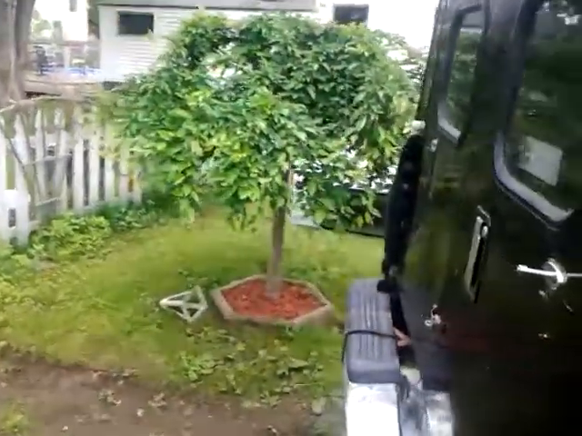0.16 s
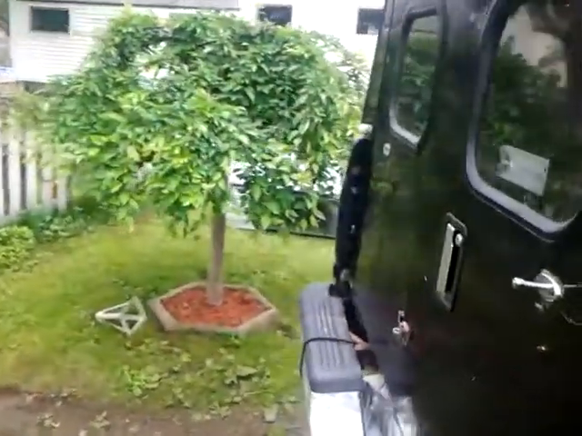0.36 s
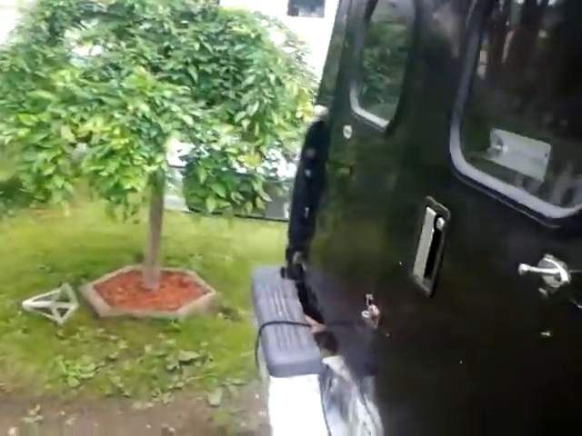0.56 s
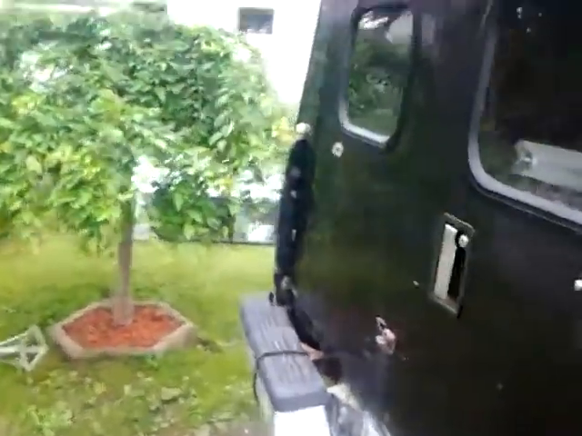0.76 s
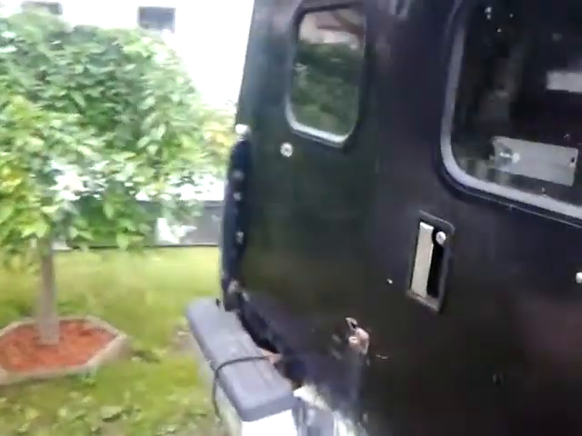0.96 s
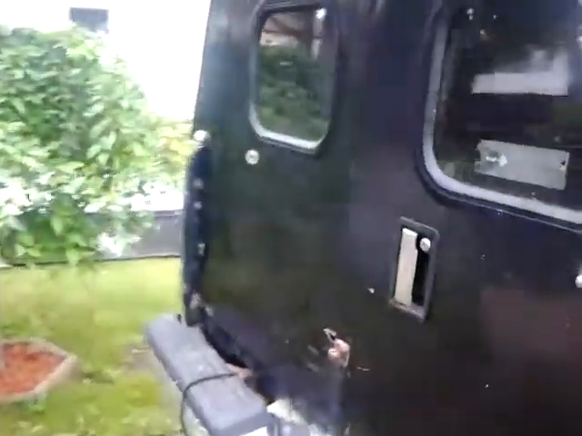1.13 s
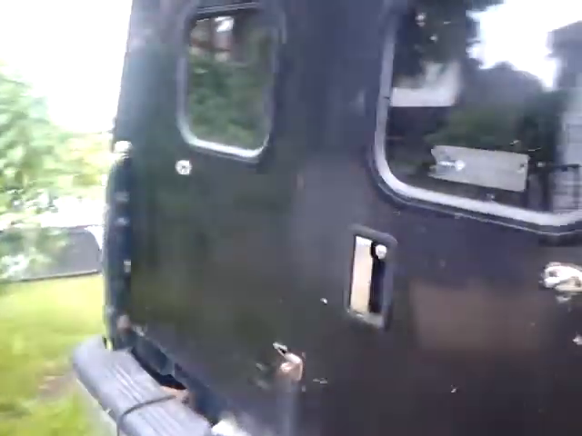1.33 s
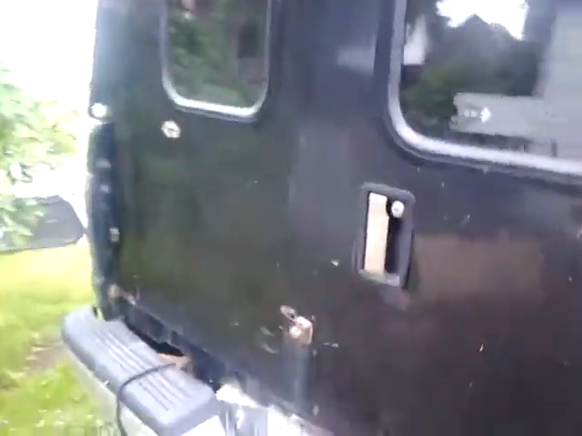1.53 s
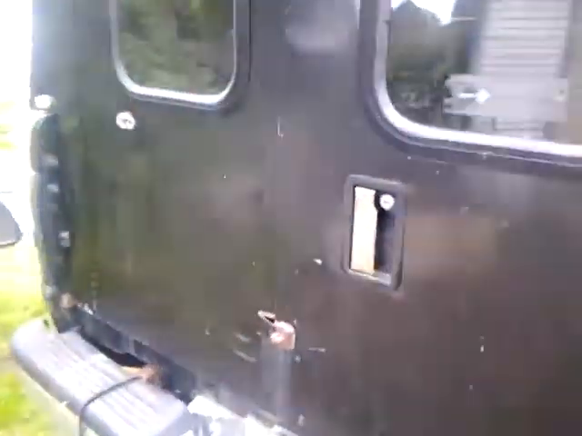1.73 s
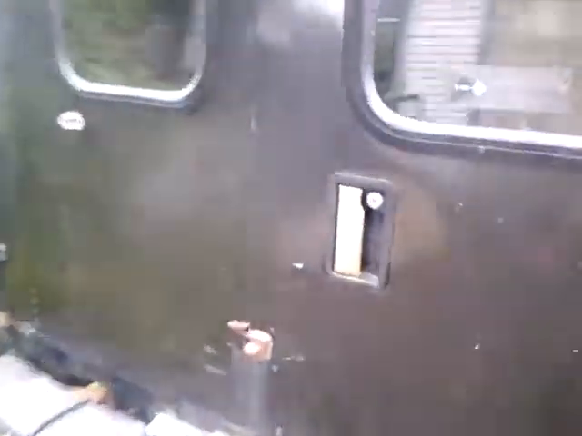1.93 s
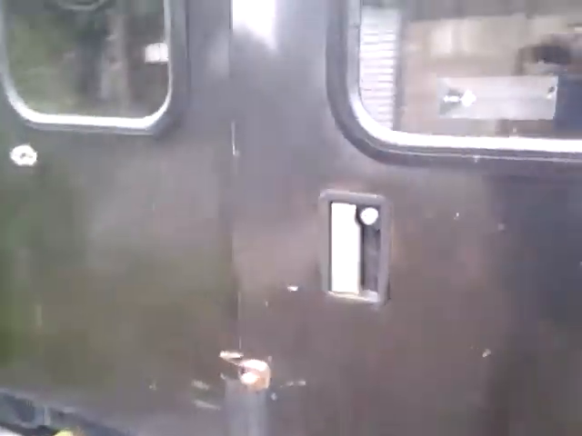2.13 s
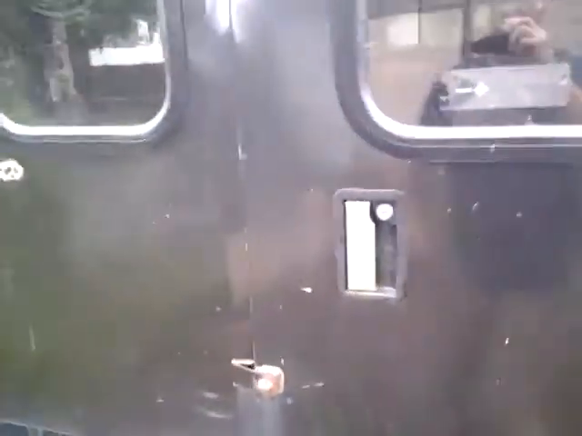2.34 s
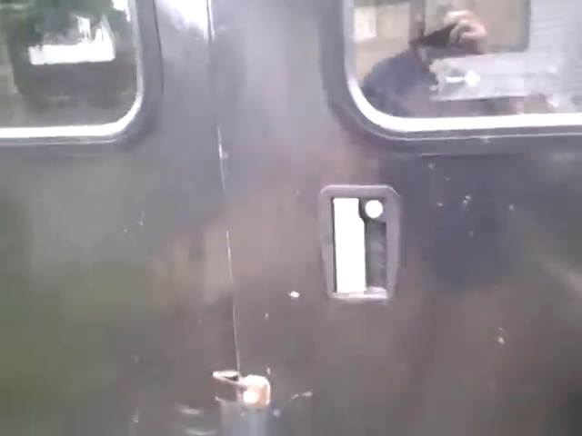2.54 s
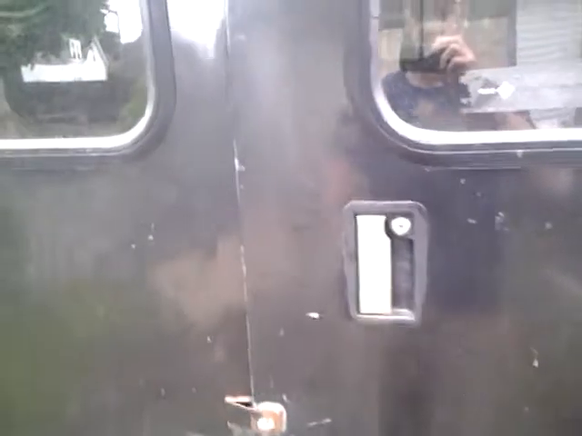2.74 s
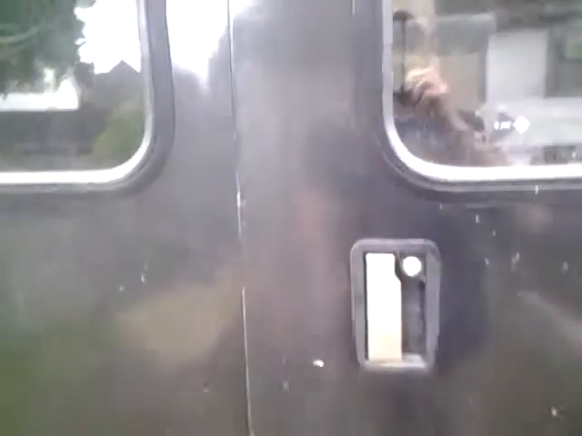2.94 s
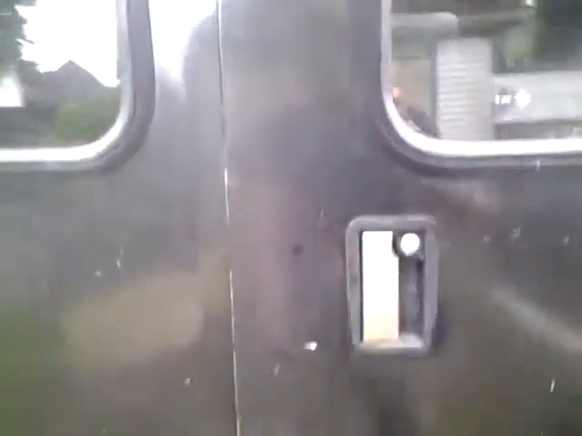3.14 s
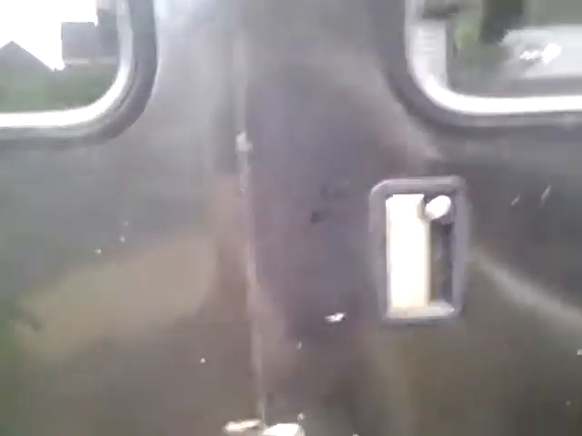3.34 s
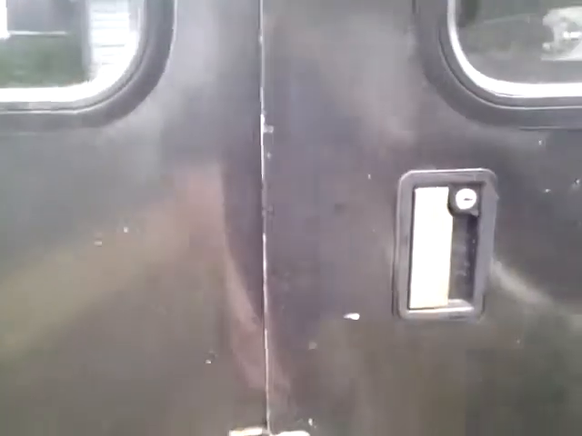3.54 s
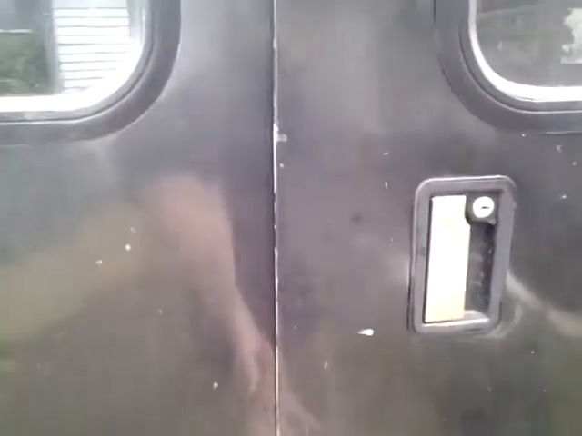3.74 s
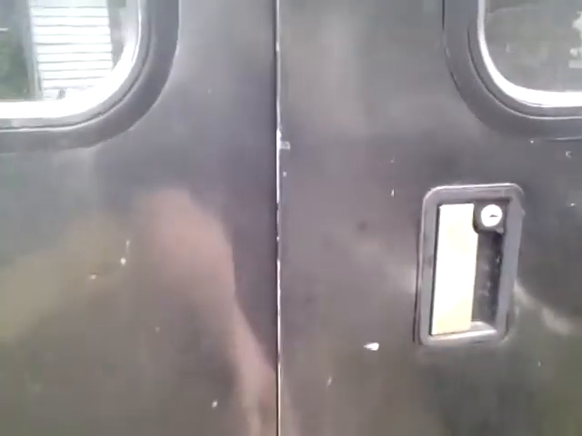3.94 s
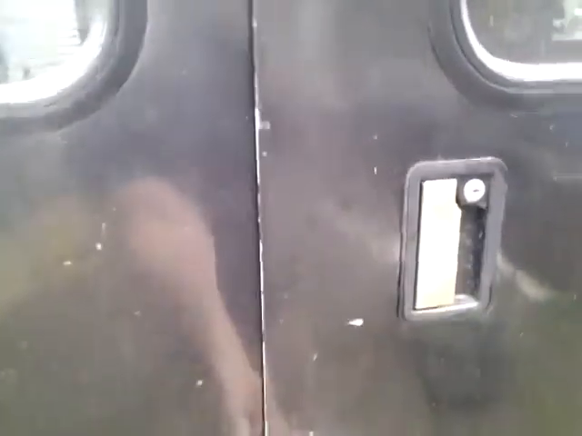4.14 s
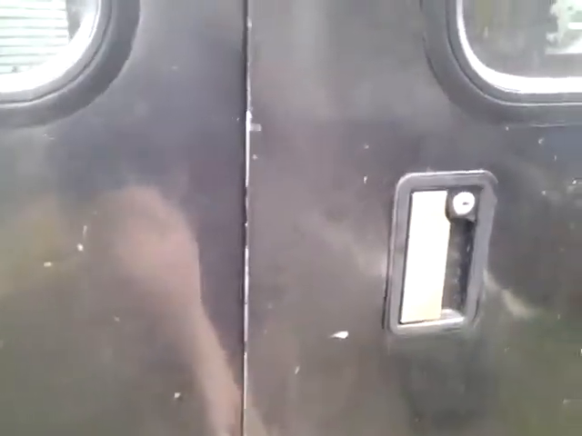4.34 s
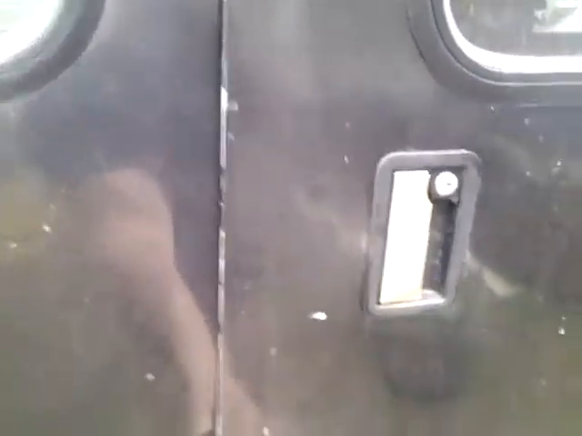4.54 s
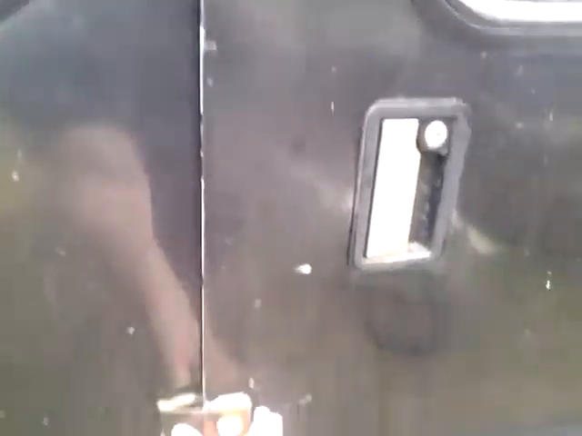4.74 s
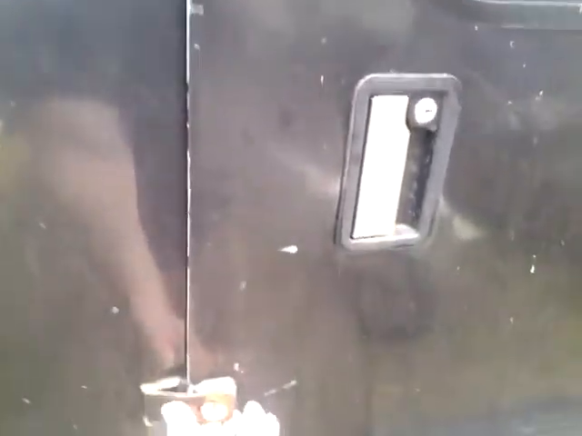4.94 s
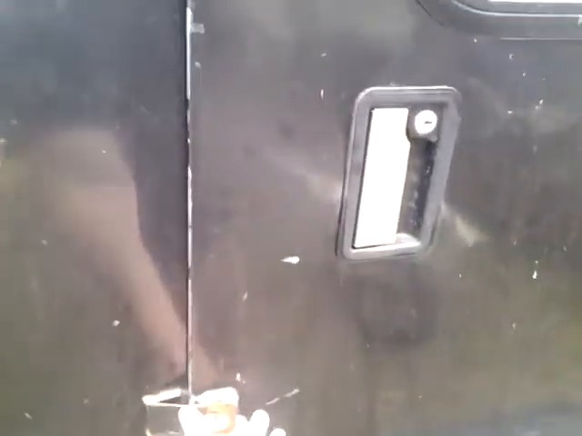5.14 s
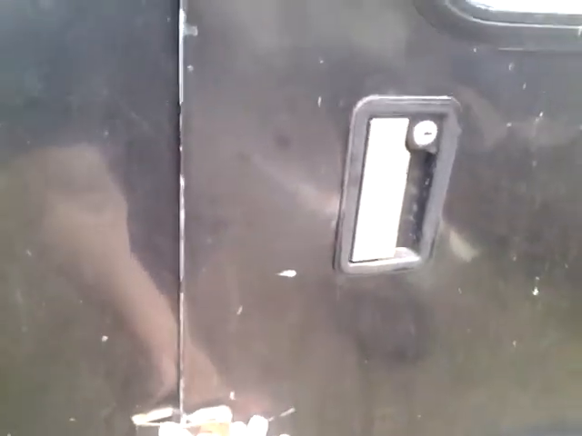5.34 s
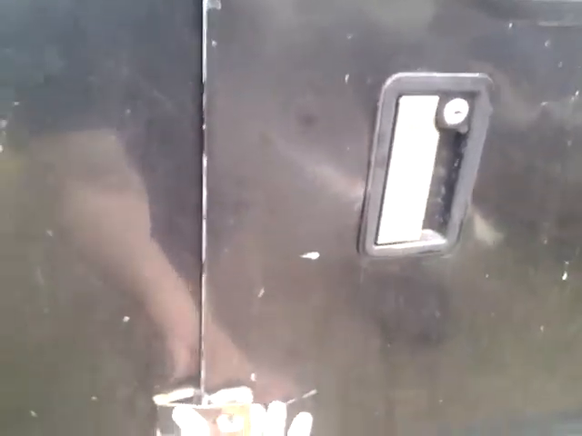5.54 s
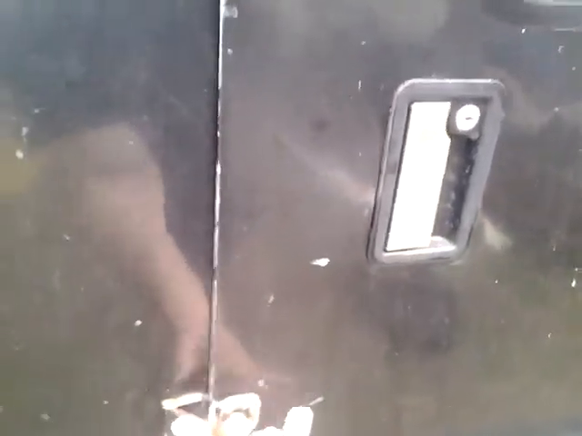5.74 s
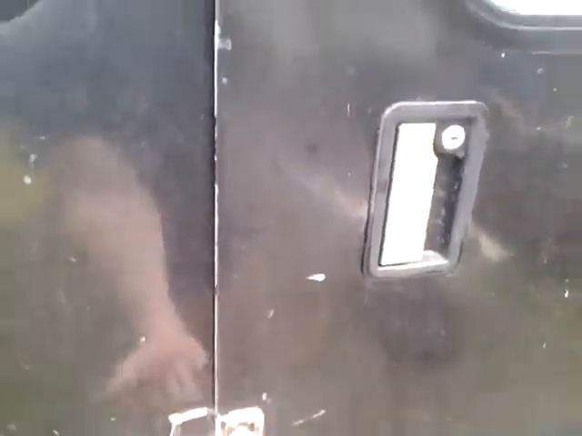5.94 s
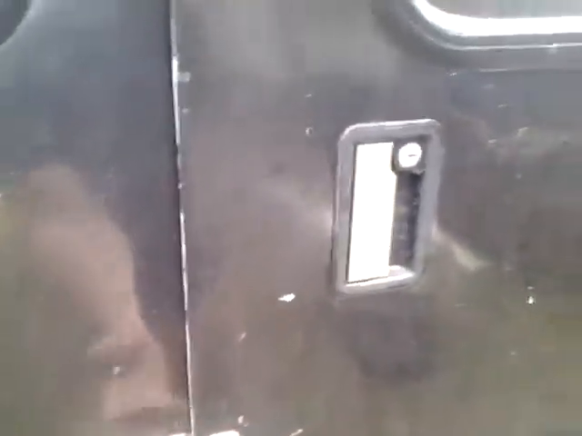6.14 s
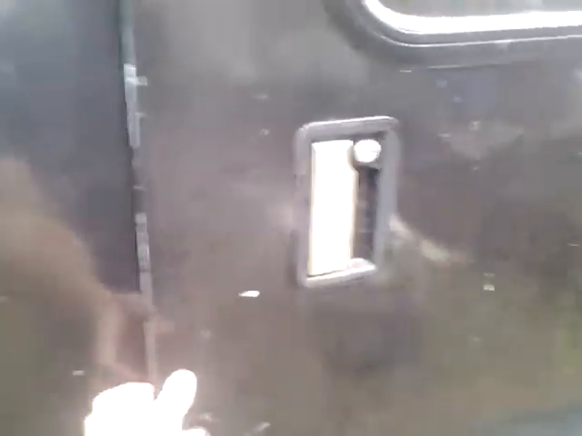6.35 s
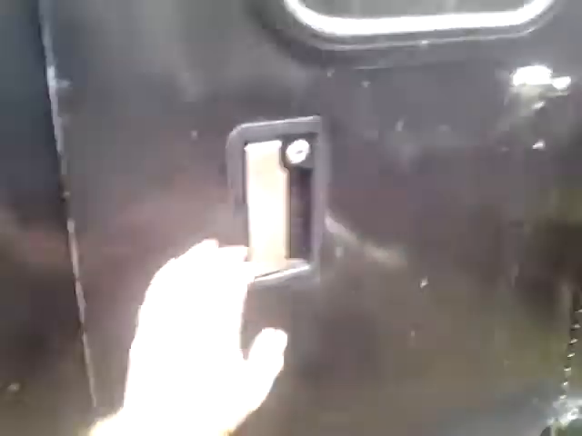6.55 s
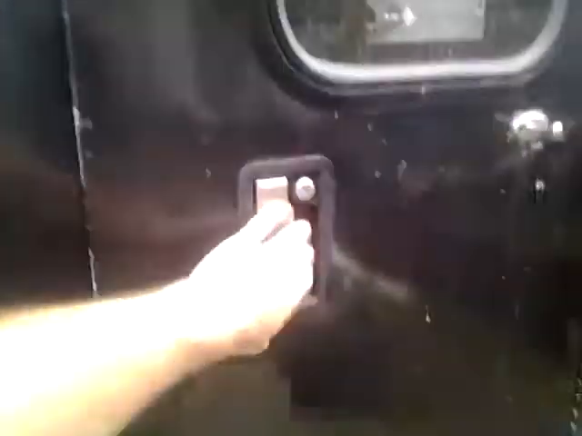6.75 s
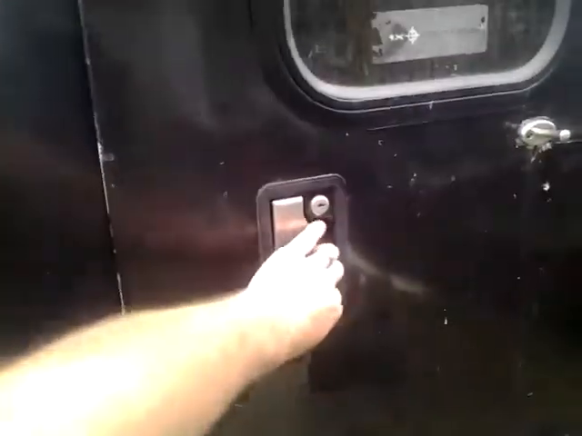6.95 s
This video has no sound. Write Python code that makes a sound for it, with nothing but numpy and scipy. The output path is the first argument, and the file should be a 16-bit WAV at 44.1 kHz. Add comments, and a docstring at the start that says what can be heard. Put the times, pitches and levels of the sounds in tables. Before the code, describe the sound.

Fingers rub and squeak on a casing in a quiet yard, a bird whistles, then a metal latch knocks, slams loudly and a handle clinks.

```python
"""Fingers rub and squeak on a hand-held camera's casing (gliding tones, shaped noise), small dry clicks sound,
and a sleeve brushes past in a quiet yard (steady noise); a songbird whistles (gliding tones). Close by, a hand
works the metal latch of a truck cap's rear door: the hasp knocks (noise bursts, damped modes), the bolt slams
with a loud clunk that shakes the door and booms in the cap (noise bursts, ringing modes, a diffuse tail), loose
parts rattle, the handle squeaks and clinks."""
import sys
import numpy as np
from scipy import signal
from scipy.fft import rfft, irfft, next_fast_len
from scipy.io import wavfile
from scipy.ndimage import map_coordinates

SR = 44100
rng = np.random.default_rng(int(sys.argv[2]) if len(sys.argv) > 2 else 0)


def unload_audio(sound):
    """Save the sound as a 16-bit wav file, at the path given as the first command line argument."""
    columns = np.transpose(np.atleast_2d(sound))
    # keep every value between -1 and 1, then stretch to whole-number steps
    steps = np.round(np.clip(columns, -1, 1) * 32767)
    wavfile.write(sys.argv[1], SR, steps.astype(np.int16))


N = 308259
TIME = np.arange(N) / SR  # [s]
AGE = np.arange(SR // 3) / SR  # [s] since a blow

# all levels are relative
# outdoor air: (time [s], level [dB])
AIR = [(0.0, -54), (5.33, -53), (5.82, -49.5), (6.99, -53)]
# sleeve strokes: (start [s], length [s], level [dB], first rasp pitch [Hz], last rasp pitch [Hz])
BRUSHES = [(0.0, 0.47, -54, 3900, 4210), (0.66, 0.0089, -43, 840, 750), (.688, .095, -45.5, 946, 690),
           (0.797, 0.039, -45.5, 638, 670), (0.845, 0.082, -50, 806, 743), (0.934, 0.054, -47, 953, 1050),
           (0.995, 0.13, -49.5, 703, 800)]
BRUSH_ATTACK_S, BRUSH_RELEASE_S = 0.0047, 0.026
# finger strokes on the casing: (start [s], length [s], rub level [dB], fine hiss against the rub [dB])
STROKES = [(-.12, 0.34, -43.5, 0), (0.247, 0.35, -50.5, 5), (0.652, 0.19, -45.5, -8),
           (0.903, 0.27, -47.5, -4), (1.178, 0.22, -50, 1), (1.733, 0.097, -53.5, 3), (1.8, 0.3, -56, -5),
           (2.238, 0.1, -53, -5), (2.535, 0.091, -51.5, -10), (2.856, 0.13, -50, -9),
           (3.0, 0.5, -54.5, -10), (5.15, 0.15, -59.5, 2), (5.363, 0.15, -48.5, -4),
           (5.946, 0.16, -52.5, 8), (6.412, 0.023, -41, -2), (6.734, 0.1, -54.5, 0),
           (6.872, 0.061, -50.5, -4)]
# knocks of hand and hasp: (time [s], level [dB], pitch [Hz], thud against the knock [dB])
KNOCKS = [(0.01, -25.5, 3040, -24), (0.098, -34.5, 1260, -17), (0.444, -39, 1460, -7),
          (1.114, -36, 1120, -13), (3.214, -33.5, 743, -11), (3.231, -36.5, 1720, -13),
          (4.0116, -29, 2240, -21), (4.0198, -23, 2270, -18.5), (4.063, -31.5, 1240, -14),
          (4.244, -23.5, 1930, -17.5), (4.332, -31.5, 1250, -10), (4.592, -34.5, 2260, -13),
          (4.993, -28, 870, -13), (5.001, -26, 2190, -9.5), (5.531, -28, 860, -7.5), (5.547, -32, 1230, -8),
          (5.636, -30.5, 1240, -5), (5.7372, -15.5, 2236, -15), (5.908, -22.5, 1200, -7.5),
          (6.287, -23, 2530, -3), (6.32, -26.5, 950, -10)]
REBOUND_S, REBOUND_DB = 0.008, -10.5
# small dry clicks: (time [s], level [dB], pitch [Hz], spectral skirt, sign ignored [dB/octave above pitch])
TICKS = [(0.011, -7.5, 9650, -9), (3.128, -23.5, 12600, 9), (3.3013, -33, 2480, 25),
         (3.3935, -25, 2940, 21), (3.4, -25, 2720, 15), (4.0327, -28, 8600, 32), (4.0429, -32, 3190, 5),
         (4.592, -33, 3470, 10), (5.9537, -22.5, 5800, 19), (6.139, -25.5, 5260, 22),
         (6.29, -23.5, 2580, 7), (6.3018, -24.5, 2590, 13), (6.32, -30, 2600, 4),
         (6.4252, -12.5, 2580, 3.5)]
# skin squeaks on the casing: (start [s], length [s], middle pitch [Hz], glide [octaves], level [dB])
SQUEAKS = [(0.035, 0.15, 11400, 0.31, -53), (0.08, 0.038, 13500, .12, -40),
           (0.145, 0.018, 11900, -.18, -43), (0.193, 0.025, 12000, -0.05, -42),
           (0.253, 0.021, 11800, 0.012, -42), (.288, 0.029, 11900, .15, -44),
           (0.667, 0.055, 15200, -.05, -42), (2.978, 0.18, 8200, 0.27, -56)]
SQUEAK_ARCH_OCTAVES = 0.071  # highest where the finger moves fastest
# slides that twitter: (start [s], length [s], centre pitch [Hz], level [dB])
TWITTERS = [(0.04, .3, 12800, -49.5), (0.34, .3, 13200, -52.5), (3.05, .2, 12000, -62)]
TWITTER_RATE_HZ, TWITTER_LENGTH_S, TWITTER_SPREAD_OCTAVES = 200, .014, .22
# one long fingertip squeak: (time [s], lowest partial [Hz], level [dB])
LONG_SQUEAK = [(3.06, 4980, -57), (3.125, 5200, -55), (3.152, 4980, -44), (3.18, 4780, -52),
               (3.225, 4580, -58), (3.24, 5050, -56), (3.28, 4400, -71), (3.32, 5150, -54),
               (3.352, 5280, -50), (3.38, 4330, -56)]
# bird phrases: (start [s], whistle level [dB], slur level [dB])
PHRASES = [(2.17, -51, -45), (2.84, -48, -50.5), (3.48, -48, -48.5)]
# first note: (time into phrase [s], pitch [Hz], level [dB])
WHISTLE = [(0, 2224, -7), (.025, 2316, 1), (.055, 2312, -2), (.09, 2180, -3), (.106, 1960, 2)]
# second note: (time into phrase [s], pitch [Hz], level [dB])
SLUR = [(.125, 2745, -1.5), (.153, 2740, -7), (.168, 2556, 5), (.182, 2321, -1.5), (.203, 2048, -5),
        (.218, 2280, -10.5), (.23, 2523, 2), (.26, 2483, -17)]
# thin, far chirps: (start [s], length [s], final pitch [Hz], level [dB])
CHIRPS = [(5.1, 0.137, 3180, -54.5)]
# bolt against its stop: (time [s], level [dB])
SLAM = [(5.762, -2), (5.7641, 1), (5.767, -12.5), (5.79, -40)]
# rattles of loose hardware: (start [s], level [dB])
RATTLES = [(5.775, -19), (6.052, -29.5)]
RATTLE_MEAN_RATE_HZ, RATTLE_FADE_DB_PER_S, RATTLE_SCATTER_DB = 170, 188, 7
# sticking handle pivot: (time [s], pitch [Hz], level [dB])
PIVOT = [(5.995, 1556, -46), (6.01, 1443, -35), (6.019, 1366, -20.5), (6.027, 1336, -29),
         (6.031, 1344, -20), (6.036, 1330, -36)]
# handle on its plate, with bounces: (time [s], steel ring level [dB], clack level [dB])
CLINKS = [(6.033, -15.5, -15.5), (6.0347, -17, -17), (6.0447, -23.5, -13), (6.0487, -28, -14),
          (6.059, -32, -19)]

# door skin modes: (frequency [Hz], level [dB])
PANEL = [(1114, -38), (1314, -58), (1507, -33), (1658, -41), (1879, -38), (2094, -35), (2223, -31.5),
         (2353, -34), (2482, -37.5), (2638, -45), (2756, -39), (3015, -49), (3365, -45)]
# steel handle modes: (frequency [Hz], level [dB], t60 [s])
STEEL = [(1230, -11, 0.1), (1350, -7, 0.1), (2130, -13, 0.1), (2868, -14, 0.15), (3230, -8, 0.074),
         (4603, -14, .07), (5270, -13, 0.07), (5960, -4, 0.09), (6400, -4, 0.066), (7036, -15, .07),
         (9814, -7.5, 0.062), (10250, -15, 0.09), (11190, -13, 0.075), (13890, -14, 0.075),
         (14600, -25, .08)]
# decay of the hollow cap: (frequency [Hz], t60 [s])
CAP_DECAY = [(100, 0.33), (400, 0.67), (2000, 0.28), (7000, 0.37), (14000, 0.45)]
# decay of the yard: (frequency [Hz], t60 [s])
YARD_DECAY = [(500, 0.5), (2500, .7), (10000, 0.26)]

# spectrum of the outdoor air: (frequency [Hz], density [dB per Hz])
YARD_COLOUR = [(25, -17), (65, -33), (110, -15.5), (190, -16.5), (350, -6.5), (650, -6.5), (2000, -2.5),
               (2600, -5), (3600, -12.5), (5200, -12), (7500, -11.5), (9800, -18), (15800, -19.5)]
# spectrum of brushed cloth: (frequency [Hz], density [dB per Hz])
SCUFF_COLOUR = [(60, -63), (250, -12), (480, -5.5), (640, -1.5), (820, -1), (1050, -0.5), (1400, -1.5),
                (2200, -5.5), (4200, -7.5), (10000, -29)]
# spectrum of rubbed skin: (frequency [Hz], density [dB per Hz])
RUB_COLOUR = [(1500, -28), (3000, -12.5), (4100, -8), (5900, -12), (7400, 0), (9200, -5), (12500, 0.5),
              (15800, -3)]
# spectrum of a knock: (frequency [Hz], density [dB per Hz])
KNOCK_COLOUR = [(290, -25), (500, -11.5), (1720, 1.5), (2210, -2), (3260, -6), (3500, -12), (4570, -21),
                (6490, -20), (9000, -19), (11700, -63), (19800, -120)]
# spectrum of a knock's thud: (frequency [Hz], density [dB per Hz])
THUD_COLOUR = [(60, -40), (130, -26), (190, -27), (260, -3.5), (410, 5.5), (570, -9.5), (800, -9.5),
               (1500, -37)]
# spectrum of the bolt's slam: (frequency [Hz], density [dB per Hz])
SLAM_COLOUR = [(18, -53), (30, -25), (70, -20), (131, -23), (473, -41), (1500, -4), (2060, -8), (2350, 1),
               (3060, -6), (3310, -6), (3870, -17), (5740, -18.5), (7090, -7.5), (10200, -26), (14800, -17),
               (16000, -12)]
# spectrum of the cap's boom: (frequency [Hz], density [dB per Hz])
CAP_COLOUR = [(41, -55), (70, -21), (148, -14), (250, -6), (472, -8.5), (649, -15.5), (1000, -0.5),
              (1410, -7), (1730, -0.5), (2720, -2), (3190, -16), (4480, -18), (7390, -10.5), (9490, -24.5),
              (14300, -26), (16000, -35)]
# spectrum of a clack on the door: (frequency [Hz], density [dB per Hz])
CLACK_COLOUR = [(120, -55), (200, -19), (850, -15), (1250, -7), (2650, -2), (3150, -5), (3970, -12.5),
                (5400, -18), (7600, -15.5), (9230, -24), (12000, -30), (16000, -33)]
TOP_HZ = 15900


def amp(db):
    """Decibels to gain."""
    return 10 ** (np.asarray(db) / 20)


def unit(x):
    """Scale to rms 1."""
    return x / np.sqrt(np.mean(x ** 2) + 1e-20)


def along(points, hz):
    """(Hz, value) points read on a log frequency axis."""
    f, v = np.transpose(points)
    return np.interp(np.log(hz + 1), np.log(f + 1), v)


def wobble(rate_hz, size=N):
    """Smooth random curve with rate_hz knots a second."""
    knots = rng.standard_normal(int(size * rate_hz / SR) + 4)
    return map_coordinates(knots, [TIME[:size] * rate_hz])


def filtered(x, response):
    """x shaped by a gain that is a function of frequency."""
    m = next_fast_len(len(x) + 8192)
    spectrum = rfft(x, m) * response(np.fft.rfftfreq(m, 1 / SR))
    return irfft(spectrum, m)[:len(x)]


def noise(colour, size):
    """Noise of rms 1 with the given spectrum."""
    return unit(filtered(rng.standard_normal(size), lambda hz: amp(along(colour, hz))))


def fade(t60_s):
    """Exponential decay by 60 dB in t60_s."""
    return np.exp(-np.log(1000) * AGE / t60_s)


def burst(colour, t60_s, attack_s):
    """A blow into countless quickly damped modes."""
    return noise(colour, len(AGE)) * fade(t60_s) * (1 - np.exp(-AGE / attack_s))


def ping(hz, t60_s, attack_s):
    """One heavily damped mode."""
    wave = np.sqrt(2) * np.sin(2 * np.pi * hz * AGE)
    return wave * fade(t60_s) * (1 - np.exp(-AGE / attack_s))


def ring(modes, t60_s):
    """Struck modes of starting rms 1, with new relative strengths at each blow."""
    hz, db = np.transpose(modes)[:2]
    size = amp(db + rng.normal(0, 1, len(hz)))
    waves = np.sin(2 * np.pi * (hz[:, None] * AGE + rng.random((len(hz), 1))))
    return np.sqrt(2) * size / np.linalg.norm(size) @ (waves * fade(t60_s))


def high_pass(x, corner_hz):
    """Small parts radiate little bass."""
    return signal.sosfilt(signal.butter(2, corner_hz, "high", fs=SR, output="sos"), x)


def add(track, s, sound):
    """Mix a sound, or a single impulse, in at time s."""
    sound = np.atleast_1d(sound)
    part = track[max(round(s * SR), 0):][:len(sound)]
    part += sound[:len(part)]


def glide(s, hz, db, jitter, jitter_rate_hz, overtones_db=()):
    """A tone whose unsteady pitch and level follow hz and db at the times s."""
    db = np.broadcast_to(db, len(s))
    t = np.arange(s[0], s[-1], 1 / SR)
    pitch = np.interp(t, s, hz) * (1 + jitter * wobble(jitter_rate_hz, size=len(t)))
    phase = 2 * np.pi * np.cumsum(pitch) / SR
    gate = np.clip(np.minimum(t - s[0], s[-1] - t) / .004, 0, 1)
    wave = np.sin(phase) + sum(amp(level) * np.sin(k * phase) for k, level in enumerate(overtones_db, 2))
    out = np.zeros(N)
    add(out, s[0], np.sqrt(2) * gate * amp(np.interp(t, s, db)) * wave)
    return out


def span(length_s):
    """Progress through a gesture, 0 to 1, and the seconds gone by."""
    u = np.linspace(0, 1, 64)
    return u, u * length_s


def swell_db(u):
    """A soft rise and fall over a gesture."""
    return 20 * np.log10(np.abs(np.sin(np.pi * u)) ** .5 + 1e-3)


def envelope(t, length_s, attack_s, release_s):
    """A quick rise, a hold until length_s, then a fade that is 20 dB down after release_s."""
    return np.clip(t / attack_s, 0, 1) * amp(-20 * np.maximum(t - length_s, 0) / release_s)


def echoes(x, decay, colour=((100, 0), (1000, 0))):
    """A diffuse tail in which each frequency dies at its own speed."""
    hz, t, z = signal.stft(noise(colour, SR), SR, nperseg=256)
    z = z * np.exp(-np.log(1000) * t / along(decay, hz)[:, None])
    tail = signal.istft(z, SR, nperseg=256)[1]
    return signal.fftconvolve(x, tail / np.linalg.norm(tail))[:N]


def yard():
    """The soft, steady rush of the neighbourhood: slightly wavering noise."""
    air_db = np.interp(TIME, *np.transpose(AIR))
    return amp(air_db + 2.5 + 0.3 * wobble(4.464)) * noise(YARD_COLOUR, N)


def fingers():
    """Skin slides over the casing: each stroke swells to a grainy hiss over a faint rumble."""
    coarse, fine = np.zeros(N), np.zeros(N)
    for start, length, db, fine_db in STROKES:
        end, ease = start + length, min(0.31 * length, .07)
        speed = np.interp(TIME, [start - ease, start + ease, end - ease, end + ease], [0, 1, 1, 0])
        coarse += amp(db) * speed
        fine += amp(db + fine_db) * speed ** 2  # the finest hiss needs the most speed
    rub = noise(RUB_COLOUR, N) * amp(1.25 * wobble(120))
    top = filtered(rub, lambda hz: 1 / (1 + (9300 / (hz + 1)) ** 12))
    rumble = noise([(60, -30), (115, 0), (260, -30), (600, -60)], N)
    body = coarse * (unit(rub - top) + amp(-37.5) * rumble)
    return body + amp(0.21 * wobble(22)) * fine * unit(top)


def sleeve():
    """Cloth catches and lets go in short grainy strokes, each with a rasp that slides in pitch."""
    out, cloth = np.zeros(N), noise(SCUFF_COLOUR, N)
    for s, length, db, start_hz, end_hz in BRUSHES:
        _, t = span(length + 2 * BRUSH_RELEASE_S)
        hz = np.interp(t, [0, length], [start_hz, end_hz])
        rasp = glide(s + t, hz, db=-5, jitter=0.1244, jitter_rate_hz=500, overtones_db=(-8,))
        stroke = envelope(TIME - s, length, BRUSH_ATTACK_S, BRUSH_RELEASE_S)
        out += amp(db) * stroke * (cloth + rasp)
    return out * amp(1.76 * wobble(220))


def knocks():
    """Light blows that rebound once: a short pitched knock, a low thud and a faint ring of the skin."""
    out = np.zeros(N)
    for s, db, hz, thud_db in KNOCKS:
        rise_s = 0.0036 * amp(thud_db)  # a softer contact thuds more and rises more slowly
        for delay_s, loss_db in ((0, 0), (REBOUND_S, REBOUND_DB)):
            knock = amp(-4.5) * burst(KNOCK_COLOUR, t60_s=0.044, attack_s=rise_s)
            knock += ping(hz, t60_s=0.023, attack_s=rise_s + 0.00014)
            thud = amp(thud_db) * burst(THUD_COLOUR, t60_s=0.09, attack_s=0.0035)
            skin = amp(-16.5) * ring(PANEL, t60_s=0.21)
            add(out, s + delay_s, amp(db + loss_db - 4) * (knock + thud + skin))
    return out


def ticks():
    """Small dry clicks: a sharp crack, a snap round each one's own pitch and a faint longer tail."""
    out = np.zeros(N)
    for s, db, hz, skirt_db in TICKS:
        skirt = abs(skirt_db)
        colour = [(hz / 8, -20 - 2 * skirt), (hz / 2, -4 - skirt), (hz, 0), (hz * 8, -3 * skirt)]
        crack = amp(4) * burst(colour, t60_s=.0016, attack_s=.00003)
        snap = amp(-5) * burst(colour, t60_s=0.008, attack_s=0.0002)
        snap += amp(-9) * ping(hz, t60_s=0.0034, attack_s=.0001)
        tail = amp(-22) * burst(colour, t60_s=0.11, attack_s=0.0013)
        add(out, s, amp(db + 0.5) * (crack + snap + tail))
    return out


def squeak(start, length, middle_hz, octaves, db):
    """Skin sticks and slips on the casing in one arched whistle."""
    u, t = span(length)
    hz = middle_hz * 2 ** (octaves * (u - .5) - SQUEAK_ARCH_OCTAVES * (2 * u - 1) ** 2)
    return glide(start + t, hz, db + swell_db(u), jitter=0.0157, jitter_rate_hz=460)


def squeaks():
    """Clear squeaks and one long broken one, while other ridges of the fingertip twitter at random."""
    out = sum(squeak(*row) for row in SQUEAKS)
    s, hz, db = np.transpose(LONG_SQUEAK)
    out += glide(s, hz, db - 3, jitter=.05, jitter_rate_hz=1500)  # rasping lowest partial
    out += glide(s, 3 * hz, db, jitter=.008, jitter_rate_hz=400)  # thin whistling third partial
    for start, length, hz, db in TWITTERS:
        for s in np.arange(start, start + length, 1 / TWITTER_RATE_HZ):
            pitch, slide, size = rng.standard_normal(3)
            onset = s + rng.random() / TWITTER_RATE_HZ
            middle_hz = hz * 2 ** (TWITTER_SPREAD_OCTAVES * pitch)
            out += squeak(onset, TWITTER_LENGTH_S, middle_hz, 0.061 * slide, db + 2 * size)
    return out * amp(2.1 * wobble(140))


def bird():
    """A whistle and a warbling slur, blurred by the houses and trees; a far chirp that scoops up."""
    song, chirps = np.zeros(N), np.zeros(N)
    for start, whistle_db, slur_db in PHRASES:
        for note, note_db, warble in ((WHISTLE, whistle_db, .008), (SLUR, slur_db, .02)):
            t, hz, db = np.transpose(note)
            song += glide(start + t, hz, note_db + db, jitter=warble, jitter_rate_hz=250, overtones_db=(-21,))
    for start, length, hz, db in CHIRPS:
        u, t = span(length)
        scoop_hz = hz * (1 - .05 * (1 - u) ** 3)
        chirps += glide(start + t, scoop_hz, db + swell_db(u), jitter=0.0049, jitter_rate_hz=240)
    song = song * amp(1.4 * wobble(110))
    return song + amp(1.5) * echoes(song, YARD_DECAY) + chirps


def bolt():
    """The bolt slams and chatters on its stop; the door skin rings and the hollow cap booms behind it."""
    out, push = np.zeros(N), np.zeros(N)
    for s, db in SLAM:
        add(out, s, amp(db + 6.0) * burst(SLAM_COLOUR, t60_s=0.025, attack_s=0.0012))
    first_s = SLAM[0][0]
    add(out, first_s, amp(-22.0) * ring(PANEL, t60_s=0.23))
    # the whole door jolts
    add(out, first_s, amp(-26) * ping(hz=35, t60_s=.04, attack_s=.001))
    add(push, first_s, amp(11.5))
    return out + echoes(push, CAP_DECAY, CAP_COLOUR)


def rattle():
    """Loose parts chatter on the door at random, ever more weakly; each contact picks one skin mode."""
    out = np.zeros(N)
    for start, db in RATTLES:
        s = start
        for gap, pick, size in rng.random((18, 3)):
            level_db = db - RATTLE_FADE_DB_PER_S * (s - start) + RATTLE_SCATTER_DB * (2 * size - 1)
            hz = PANEL[int(pick * len(PANEL))][0]
            contact = ping(hz, t60_s=0.019, attack_s=0.00014)
            contact += amp(-0.5) * burst(CLACK_COLOUR, t60_s=0.015, attack_s=0.00022)
            add(out, s, amp(level_db) * contact)
            s += 2 * gap / RATTLE_MEAN_RATE_HZ
    return out


def pivot():
    """The handle squeaks on its pivot as it starts to move; dry friction rasps with each swing."""
    tone = glide(*np.transpose(PIVOT), jitter=0.037, jitter_rate_hz=830, overtones_db=(-15,))
    rasp = amp(-11.5) * np.abs(tone) * noise(CLACK_COLOUR, N)
    return high_pass(tone + rasp, corner_hz=500)


def handle():
    """The steel handle clinks on its plate, ringing in its modes, and clacks against the door."""
    out = np.zeros(N)
    steel_t60_s = np.array(STEEL)[:, 2:]
    for s, ring_db, clack_db in CLINKS:
        add(out, s, amp(ring_db) * ring(STEEL, steel_t60_s))
        clack = burst(CLACK_COLOUR, t60_s=0.039, attack_s=0.00042)
        add(out, s, amp(clack_db) * (clack + amp(-12.5) * ring(PANEL, t60_s=0.11)))
    return out


def scene():
    """The latch sounds in front of the hollow cap, with the yard all round."""
    latch = high_pass(knocks() + ticks() + rattle() + handle(), corner_hz=203)
    cap = amp(-13.0) * echoes(latch, CAP_DECAY, [(600, 8.5), (2500, 0.0), (7000, -7.5)])
    door = latch + cap + bolt() + pivot()
    return (yard() + fingers() + sleeve() + squeaks() + bird() + door)[None]


def record(dry):
    """The microphone saturates smoothly towards 0.73 and keeps nothing from TOP_HZ up."""
    clipped = dry[0] / (1 + np.abs(dry[0] / .73) ** 6) ** (1 / 6)
    return filtered(clipped, lambda hz: hz < TOP_HZ)[None]


dry = scene()
out = record(dry)
unload_audio(out)
```